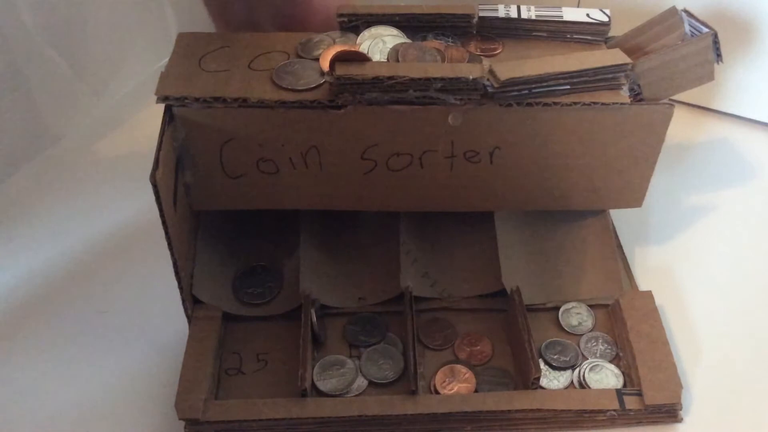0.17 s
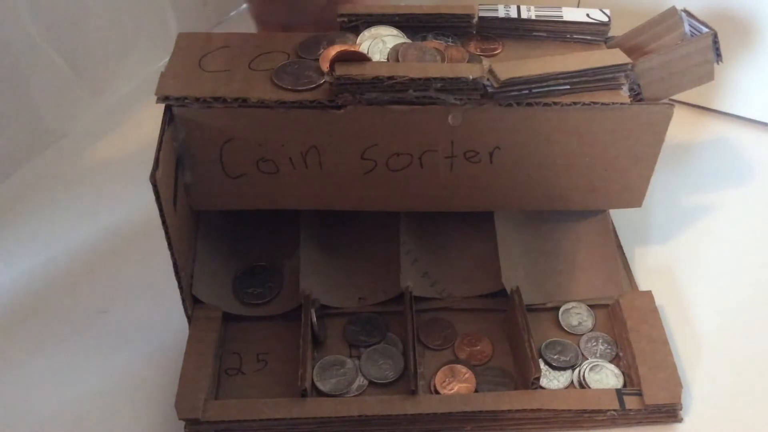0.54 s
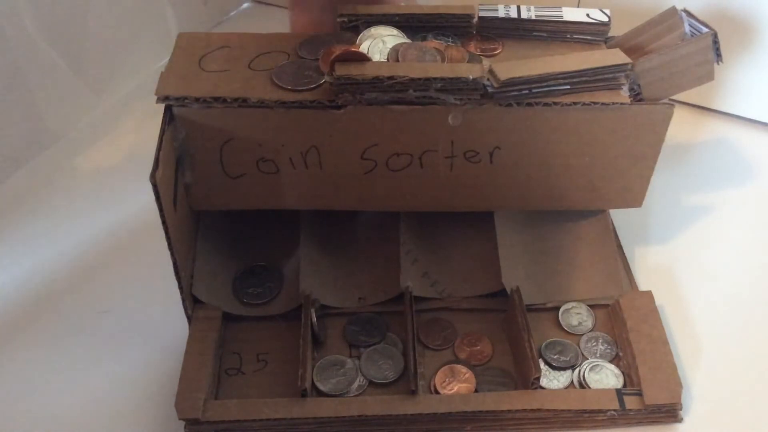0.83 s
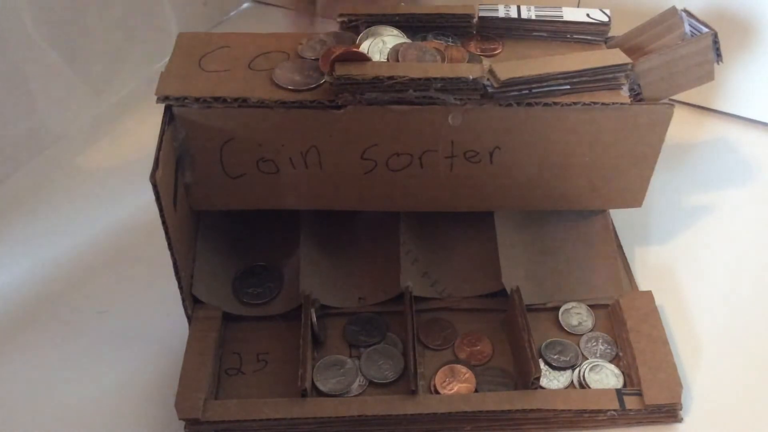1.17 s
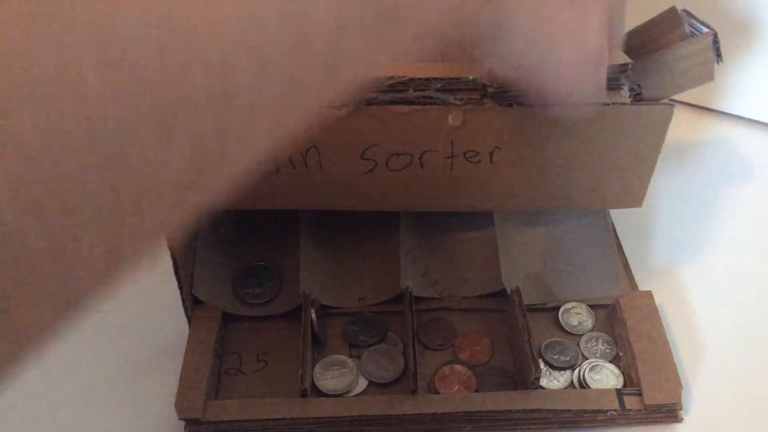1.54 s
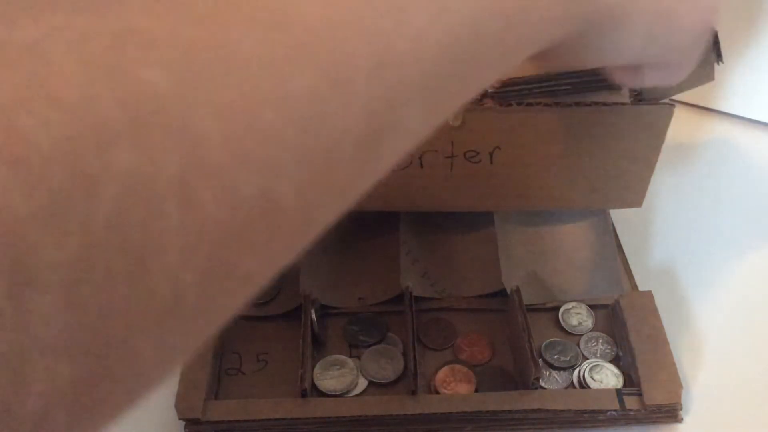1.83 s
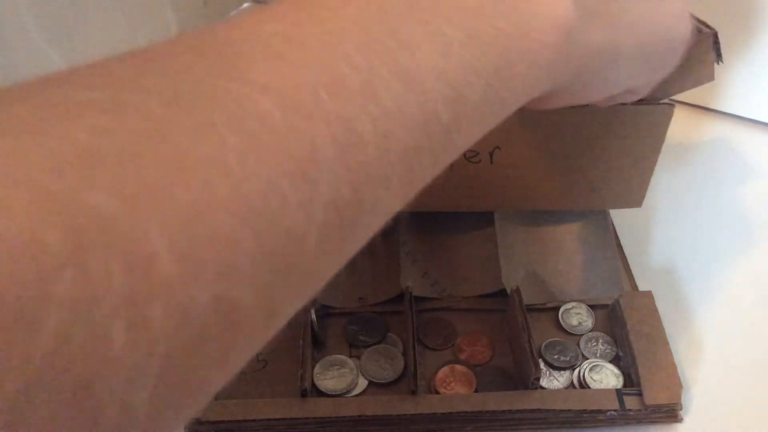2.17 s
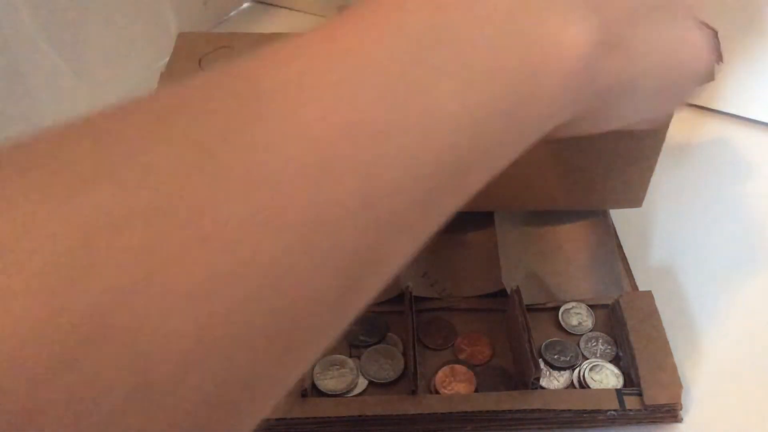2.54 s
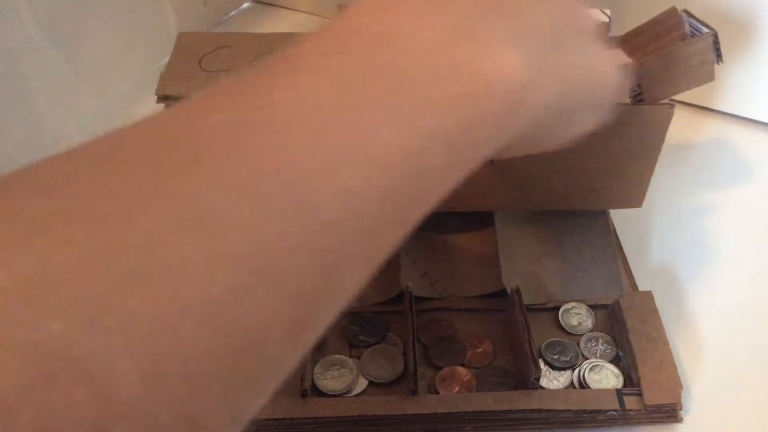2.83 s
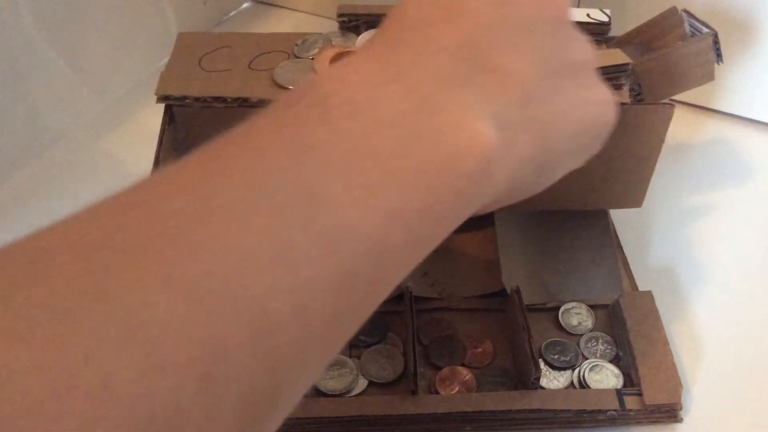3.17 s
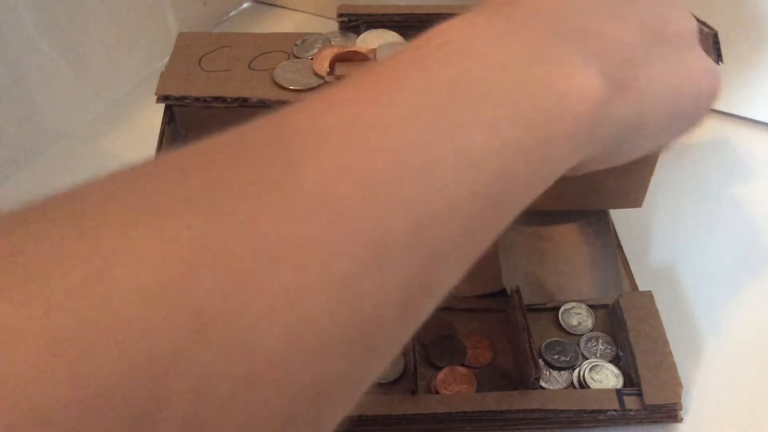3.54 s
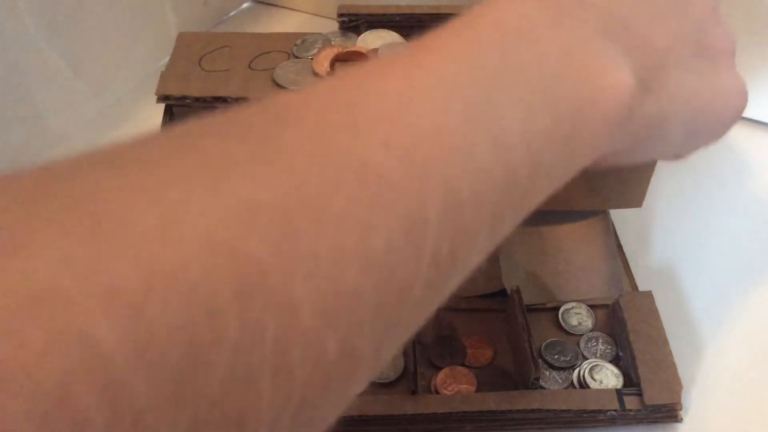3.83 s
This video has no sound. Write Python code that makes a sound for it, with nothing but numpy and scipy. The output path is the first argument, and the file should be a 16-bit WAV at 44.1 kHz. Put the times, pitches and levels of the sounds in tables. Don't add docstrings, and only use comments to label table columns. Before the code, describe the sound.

Cardboard box handling, close and dry in a quiet room with faint low air noise. Soft finger rustles at 0-0.7 s and near 1 s, then near silence. From 1.7 to 2.5 s a flap jerks in fast, hollow, woody knocks. At 2.6-3.3 s coins scrape, hiss and rattle with bright chinks; a second push from 3.4 s thumps, clinks once, and fades in lighter ticks.

```python
import sys
import numpy as np
from scipy import signal
from scipy.fft import rfft, irfft
from scipy.io import wavfile
from scipy.ndimage import uniform_filter1d

SR = 44100
rng = np.random.default_rng(int(sys.argv[2]) if len(sys.argv) > 2 else 0)


def materialize(psi):
    bounded = np.clip(np.atleast_2d(psi).T, -1, 1)
    quanta = np.round(bounded * 32767).astype(np.int16)
    wavfile.write(sys.argv[1], SR, quanta)


def linear_from_db(decibels):
    return 10 ** (np.asarray(decibels, float) / 20)


N = 176400

# [f/Hz, width/Hz, level/dB]
FLAP_MODES = [(329, 197, -6), (578, 133, 4.5), (905, 207, -9), (1122, 80, -2.5), (1380, 58.5, 3.5),
              (2026, 142, -0.5), (2622, 28, -9), (4200, 170, -22)]
# [f/Hz, width/Hz, level/dB]
BOX_MODES = [(380, 175, -2.5), (590, 131, 5), (947, 230, 0), (1332, 170, 0.5), (1740, 180, -0.5),
             (2160, 217, -7.5), (3220, 92, -18), (4070, 190, -21)]
# [f/Hz, level/dB]
HISS_COLOUR = [(1470, 16), (2500, 14), (2890, 13), (4890, 10), (6850, 2.5), (9150, 9), (13000, 4.5),
               (15500, 6.5)]
TABLE_HZ, TABLE_WIDTH_HZ = 114, 300


def rms_one(x):
    return x / np.sqrt(np.mean(x ** 2) + 1e-20)


def add(out, start_s, x):
    i = int(start_s * SR)
    out[i:i + len(x)] += x[:N - i]


def wander(rate):
    knots = rng.standard_normal(int(4 * rate) + 2)
    return np.interp(np.linspace(0, len(knots) - 1, N), np.arange(len(knots)), knots)


def grit(rate, spread_db):
    hits = rng.random(N) < rate / SR
    size = linear_from_db(spread_db * np.minimum(rng.exponential(1, N), 4))
    return hits * size * rng.choice([-1, 1], N)


def coloured(x, points, tilt_db=0):
    hz = np.maximum(np.arange(len(x) // 2 + 1) * SR / len(x), 10)
    f, db = np.transpose(points)
    gain_db = np.interp(np.log(hz), np.log(f), db) + tilt_db * np.log2(hz / 1500)
    return irfft(rfft(x) * linear_from_db(gain_db), len(x))


def resonate(x, hz, width_hz):
    r = np.exp(-np.pi * width_hz / SR)
    feedback = [1, -2 * r * np.cos(2 * np.pi * hz / SR), r * r]
    return signal.lfilter([(1 - r * r) / 2, 0, (r * r - 1) / 2], feedback, x + 1e-18)


def ring_width(t60_s):
    return np.log(1000) / np.pi / t60_s


def body(x, modes, extra_db):
    return sum((-1) ** k * linear_from_db(db + extra_db[k]) * resonate(x, hz, width_hz)
               for k, (hz, width_hz, db) in enumerate(modes))


def knocks(rows, modes, focus_db):
    out, t = np.zeros(N), np.arange(4096) / SR
    mode_hz = np.array(modes)[:, 0]
    for s, db, strongest_hz, snap_db, contact_ms in rows:
        push, noise = rng.standard_normal((2, len(t)))
        odd = rng.standard_normal(len(modes))
        u = t / (max(contact_ms, .15) / 1000)
        contact = u * u * np.exp(2 - u) / 4
        thud = body(push * contact, modes, odd - focus_db * np.abs(np.log2(mode_hz / strongest_hz)))
        bright = sum(linear_from_db(4.0 * o) * resonate(noise, hz, 0.35 * hz)
                     for o, hz in zip(odd, np.geomspace(2500, 14000, len(odd))))
        snap = coloured(bright, HISS_COLOUR) * (contact + 0.25 * np.exp(-t / .015))
        blow = thud / np.abs(thud).max() + linear_from_db(snap_db + 5.0) * snap / np.abs(snap).max()
        add(out, s - contact_ms / 700, linear_from_db(db) * blow)
    return out


def flap_tugs():
    # [t/s, peak level/dB, strongest f/Hz, snap level/dB, contact/ms]
    jerks = [(1.671, -50, 746, -12, 1.6), (1.768, -31.5, 320, -14.5, 1.06), (1.86, -9, 1380, -25, 2.33),
             (1.896, -24, 606, -33, 1.17), (1.917, -25, 587, -29, 1.22), (1.941, -7, 1470, -31, 2.16),
             (1.953, -13.5, 1380, -28, 1.4), (1.985, -24, 536, -19, 0.82), (2.008, -7.5, 1200, -23.5, 2.5),
             (2.061, -9.5, 1390, -31, 3.3), (2.097, -15.5, 1380, -44, 1.53), (2.162, -13, 1440, -38, 2.26),
             (2.426, -17.5, 1290, -17.5, 1.86), (2.471, -15, 417, -34, 2.6), (2.513, -18, 579, -29, 1.02)]
    # [t/s, peak level/dB, strongest f/Hz]
    slips = [(1.825, -45, 437), (1.835, -32.5, 456), (2.022, -20, 1380), (2.121, -40, 2000),
             (2.134, -22, 1380), (2.14, -16, 1310), (2.152, -20.5, 1380), (2.18, -19, 1380),
             (2.188, -23, 2000), (2.204, -19.5, 1380), (2.218, -28.5, 606), (2.226, -23.5, 1970),
             (2.237, -28.5, 1380), (2.332, -40, 573), (2.369, -38, 543), (2.397, -27, 1990),
             (2.462, -28, 600), (2.481, -16, 980), (2.521, -29.5, 600)]
    snap_db, contact_ms = -34, 1.3
    small = [(*row, snap_db, contact_ms) for row in slips]
    return knocks(jerks, FLAP_MODES, focus_db=4.5) + knocks(small, FLAP_MODES, focus_db=8.5)


def box_knocks():
    # [t/s, peak level/dB, strongest f/Hz, snap level/dB, contact/ms]
    first_push = [(2.58, -18, 850, -8.5, 1), (2.593, -4, 1650, -12, 1), (2.675, -1.5, 1040, -45, 0.78),
                  (2.692, -18, 640, -10.5, 0.92), (2.707, -10, 1030, -11, 0.75),
                  (2.715, -10, 930, -11, 0.99), (2.731, -12, 770, -19, 0.48), (2.745, -18, 1100, -10, 0.83),
                  (2.78, -11, 650, -21, 1), (3.102, -13.5, 1540, -19, 0.94), (3.272, -18.5, 930, -43, 0.75),
                  (3.298, -21.5, 880, -35, 0.74), (3.317, -17, 840, -50, 0.84), (3.328, -25.5, 860, -58, 1),
                  (3.36, -18.5, 543, -54, 0.66)]
    # [t/s, peak level/dB, strongest f/Hz, snap level/dB, contact/ms]
    second_push = [(3.413, -13.5, 380, -14, 2.27), (3.513, -11, 550, -9.5, 0.91),
                   (3.52, -13.5, 1830, -10, 1.68), (3.53, -24, 587, -7.5, 1.9),
                   (3.547, -20, 630, -27, 3.04), (3.57, -28.5, 574, -9.5, 3.6),
                   (3.589, -19, 590, -13, 1.26), (3.64, -24.5, 570, -18, 0.87),
                   (3.688, -25, 530, -0.5, 1.2), (3.822, -11.5, 685, -14.5, 1.24),
                   (3.848, -15.5, 600, -23, 2.32), (3.862, -21.5, 560, -40, 1.25),
                   (3.965, -51, 530, -39, 1.1)]
    # [t/s, peak level/dB, strongest f/Hz]
    ticks = [(0.957, -45, 380), (2.823, -17, 1770), (2.872, -13, 684), (2.885, -20.5, 600),
             (2.902, -20, 1680), (2.967, -24, 1320), (3.002, -25.5, 608), (3.074, -21, 608),
             (3.08, -22.5, 1300), (3.123, -20.5, 1400), (3.165, -30.5, 530), (3.204, -30, 643),
             (3.253, -33, 940), (3.612, -33, 590), (3.627, -31, 590), (3.719, -27.5, 530),
             (3.811, -30, 600), (3.836, -24.5, 1310), (3.941, -32.5, 445), (3.98, -33.5, 540),
             (1.786, -42, 2100), (1.799, -52, 2170), (1.812, -48, 2100)]
    snap_db, contact_ms = -22, 1.193
    small = [(*row, snap_db, contact_ms) for row in ticks]
    pushes = knocks(first_push, BOX_MODES, focus_db=6.5) + knocks(second_push, BOX_MODES, focus_db=0.5)
    return pushes + knocks(small, BOX_MODES, focus_db=11.5)


def drag():
    # [t/s, length/s, card rumble level/dB, hiss level/dB, coin jingle level/dB]
    pulls = [(1.761, 0.18, -53, -64, -77), (1.88, .24, -45, -55, -85), (2.08, .16, -37.5, -61.5, -84),
             (2.238, 0.17, -63, -78, -90), (2.325, 0.1, -47.5, -65, -85), (2.358, 0.084, -41.5, -53, -75),
             (2.419, 0.16, -45.5, -62, -75), (2.586, 0.19, -45, -57.5, -81), (2.684, 0.1, -33, -50, -43),
             (2.772, .2, -28, -30.5, -31), (2.958, 0.13, -34.5, -39.5, -39.5),
             (3.063, 0.08, -29, -47.5, -44), (3.103, 0.27, -42, -62.5, -77),
             (3.406, 0.072, -42.5, -46, -47), (3.497, 0.16, -41, -48.5, -67),
             (3.643, 0.069, -45.5, -55, -40.5), (3.685, 0.038, -33.5, -36, -42),
             (3.727, 0.086, -40, -45.5, -49), (3.806, 0.08, -32.5, -48.5, -61),
             (3.876, 0.059, -49, -52, -54), (3.929, .1, -53, -56.5, -54)]
    grip_s, let_go_s, flap_left_s = 0.011, 0.061, 2.56
    t, gains = np.arange(N) / SR, np.zeros((3, N))
    for s, length, *db in pulls:
        grip = np.minimum((t - s) / grip_s, (s + length - t) / let_go_s + .5)
        gains += linear_from_db(np.array(db))[:, None] * np.clip(grip, 0, 1) ** 2
    lumps = wander(90)
    grains = uniform_filter1d(grit(1300, 2.8) * linear_from_db(0.53 * lumps), size=5)
    flap = rms_one(body(grains, FLAP_MODES, [1.5 * wander(18) for _ in FLAP_MODES]))
    box = rms_one(body(grains, BOX_MODES, [3.5 * wander(18) for _ in BOX_MODES]))
    table_shake = rms_one(resonate(rng.standard_normal(N), TABLE_HZ, TABLE_WIDTH_HZ))
    card = np.where(t < flap_left_s, flap, box) + linear_from_db(-27) * table_shake
    fine = coloured(grit(6000, 3.5) * linear_from_db(4.5 * lumps), HISS_COLOUR)
    hiss = sum(linear_from_db(6.8 * wander(14)) * resonate(fine, hz, 1.1 * hz) for hz in np.geomspace(2800, 15000, 7))
    jingle = np.zeros(N)
    for hz in 13000 + 1200 * np.linspace(-1, 1, 14):
        touches = grit(260, 2.5) * linear_from_db(4.0 * wander(7.8))
        jingle += resonate(touches, hz + 100 * rng.standard_normal(), 300)
    return np.sum(gains * [card, rms_one(hiss), rms_one(jingle)], axis=0)


def big_coin():
    # [f/Hz, level/dB, time to die by 60 dB/s]
    coin_modes = [(9030, -5, .09), (9290, -4, .3), (9420, -5, .1), (9810, -5, .1), (10230, -7, .08)]
    clink_s, clink_db, rattle_s, caught_s = 3.511, -25, 0.02, 0.115
    out, t = np.zeros(N), np.arange(SR // 4) / SR
    ring = np.zeros(len(t))
    for hz, db, t60_s in coin_modes:
        rattle = rng.standard_normal(len(t)) ** 3 * np.exp(-t / rattle_s)
        ring += linear_from_db(db) * rms_one(resonate(rattle, hz, ring_width(t60_s)))
    flutter = linear_from_db(clink_db + 2.8 * wander(190)[:len(t)])
    caught = linear_from_db(-np.maximum(t - caught_s, 0) * 370)
    add(out, clink_s, flutter * ring / np.abs(ring).max() * caught)
    return out


def chinks():
    # [t/s, peak level/dB, f/Hz, time to die by 60 dB/s]
    touches = [(2.693, -29, 13000, 0.18), (2.715, -30, 13400, .1), (2.779, -29, 13400, 0.044),
               (3.077, -26, 12750, .11), (3.09, -32, 12500, 0.19), (3.103, -24.5, 13000, 0.077),
               (3.639, -38, 13100, .15), (3.687, -27, 12300, 0.053), (3.695, -33, 13500, 0.077),
               (3.976, -43, 13100, .12)]
    out, t = np.zeros(N), np.arange(SR // 6) / SR
    for s, db, hz, t60_s in touches:
        rattle = rng.standard_normal((2, len(t))) ** 3 * np.exp(-t / .01)
        width_hz = ring_width(t60_s)
        ring = resonate(rattle[0], hz, width_hz) + 0.67 * resonate(rattle[1], hz * 1.035, width_hz)
        add(out, s, linear_from_db(db) * ring / np.abs(ring).max())
    return out


def card_grain():
    # [f/Hz, width/Hz, level/dB]
    card_modes = [(1035, 890, -4.5), (1962, 220, 11), (2500, 660, -16), (4210, 900, 12)]
    grain = grit(5000, 1.7)
    return grain + body(grain, card_modes, [3 * wander(25) for _ in card_modes])


def brushes(grain):
    # [t/s, length/s, level/dB, rise share 0-1, tilt/dB per octave]
    strokes = [(0.032, 0.12, -41.5, 0.5, 0.6), (0.152, 0.03, -55, 0, -2.5), (0.168, 0.29, -67.5, 0.23, 2),
               (0.432, 0.25, -59, 0.39, 0.5), (0.631, 0.0096, -57.5, 0.3, 4),
               (0.93, 0.079, -43.5, 0.33, -7.5), (1.032, 0.067, -52, 1, 1), (1.678, 0.1, -63.5, 0.46, 0.5)]
    # [f/Hz, level/dB]
    skin_colour = [(250, -16), (900, -7.5), (2900, -10.5), (5200, -17), (6700, -21), (8100, -16),
                   (15500, -30.5)]
    out = np.zeros(N)
    for s, length, db, rise, tilt_db in strokes:
        u = np.linspace(0, 1, int(length * SR) // 2 * 2)
        rise_fall = np.interp(u, [0, np.clip(rise, .02, .98), 1], [0, 1, 0])
        swell = np.sin(np.pi / 2 * rise_fall) ** 1.13
        rustle = coloured(grain[int(s * SR):][:len(u)], skin_colour, tilt_db)
        add(out, s, linear_from_db(db) * swell * rms_one(rustle))
    return out


def squeaks(grain):
    # [t/s, length/s, f/Hz, level/dB]
    rubs = [(0.032, 0.075, 1012, -39.5), (.035, 0.072, 1950, -47), (0.062, 0.072, 4630, -44.5),
            (0.064, 0.083, 2920, -46.5), (1.056, 0.055, 2090, -58), (1.24, 0.13, 1740, -75),
            (2.798, 0.22, 2234, -29), (3.721, 0.081, 4700, -40.5)]
    out = np.zeros(N)
    for s, length, hz, db in rubs:
        squeak = grain[int(s * SR):][:int(length * SR)]
        for _ in range(2):
            squeak = resonate(squeak, hz, 0.23 * hz)
        add(out, s, linear_from_db(db) * rms_one(squeak) * np.hanning(len(squeak)) ** 0.52)
    return out


def table():
    # [t/s, level/dB]
    thumps = [(2.399, -61), (2.472, -53), (2.594, -49), (3.1, -56), (3.292, -60), (3.414, -38.5),
              (3.588, -51.5)]
    out = np.zeros(N)
    for s, db in thumps:
        add(out, s, linear_from_db(db) * np.hanning(60))
    return 20 * resonate(out, TABLE_HZ, TABLE_WIDTH_HZ)


def room(x):
    t60_s, level_db = .12, -20
    t = np.arange(SR // 3) / SR
    dull = signal.lfilter([1], [1, -.4], rng.standard_normal(len(t)))
    tail = dull * linear_from_db(-60 * t / t60_s) * (t > .004)
    return linear_from_db(level_db) * signal.fftconvolve(x, tail / np.sqrt(np.sum(tail ** 2)))[:N]


def room_air():
    # [f/Hz, level/dB]
    air_colour = [(25, -27), (50, -2.5), (110, -4.5), (260, -16.5), (1300, -26.5), (6300, -33.5),
                  (9000, -30), (16000, -36)]
    return linear_from_db(-66) * rms_one(coloured(rng.standard_normal(N), air_colour))


def scene():
    blow_high_pass = signal.butter(2, 200, "high", fs=SR, output="sos")
    near = signal.sosfilt(blow_high_pass, flap_tugs() + box_knocks())
    near += drag() + big_coin() + chinks()
    grain = card_grain()
    near += brushes(grain) + squeaks(grain) + table()
    return (near + room(near) + room_air())[None]


def roll_off(x):
    return signal.sosfilt(signal.butter(12, 16470, fs=SR, output="sos"), x)


def record(dry):
    bass_cut = signal.butter(4, 42, "high", fs=SR, output="sos")
    top_cut = signal.ellip(10, 1, 38, 15370, fs=SR, output="sos")
    mix = signal.sosfilt(top_cut, signal.sosfilt(bass_cut, dry))
    return roll_off(mix)


dry = scene()
out = record(dry)
materialize(out)
```